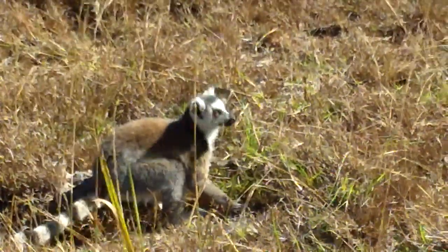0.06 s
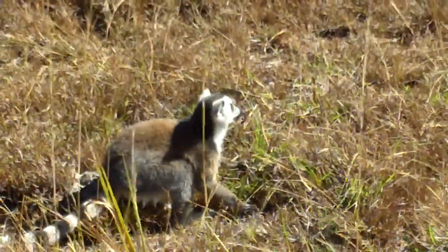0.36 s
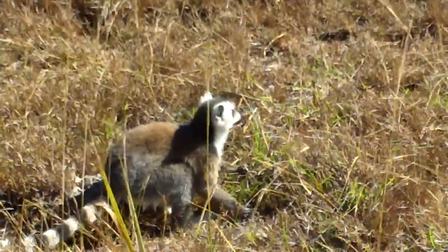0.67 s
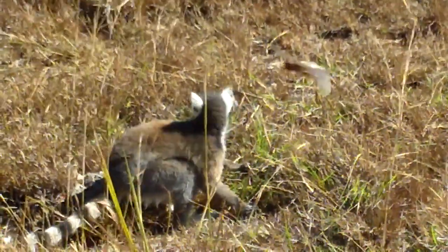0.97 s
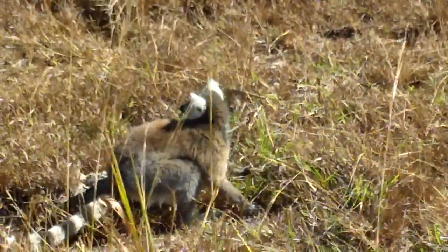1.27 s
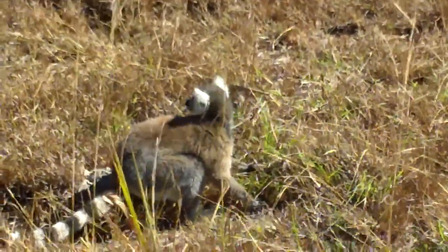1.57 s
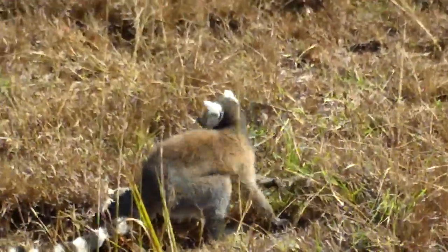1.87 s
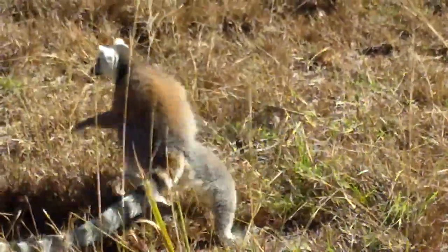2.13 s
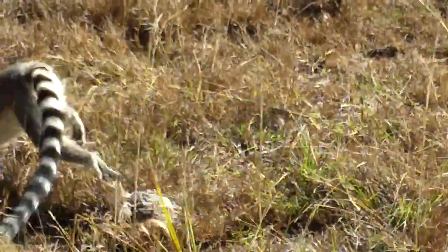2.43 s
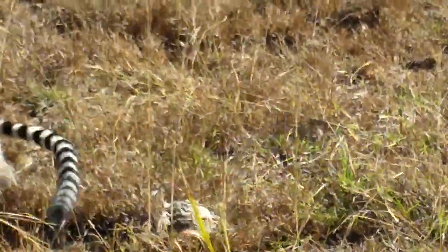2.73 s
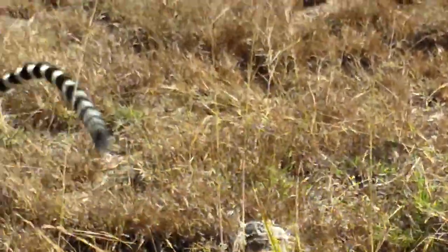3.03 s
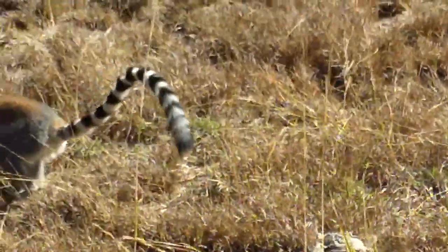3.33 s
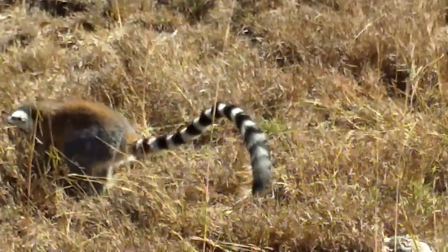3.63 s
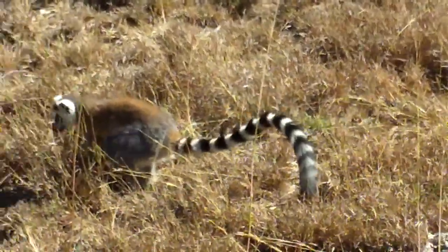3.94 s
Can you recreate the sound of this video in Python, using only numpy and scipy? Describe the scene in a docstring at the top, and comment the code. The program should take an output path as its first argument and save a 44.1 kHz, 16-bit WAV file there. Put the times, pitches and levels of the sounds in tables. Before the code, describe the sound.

One thin wail from a lemur sinks in pitch outdoors while gusts hit the microphone with low thumps and pops. Dry grass then rustles and crackles as the animal leaps off. Insects, a small bird and far hoots stay faint.

```python
"""A ring-tailed lemur gives one thin, slowly falling wail, a stack of overtones shaped by its mouth,
then bounds away through dry grass that swishes and snaps. Wind hits the microphone in low thumps and
pops; the hardest overload it, and the background of air and insects dips after them.
A small bird whistles pure notes, and faint hoots come from far off."""
import sys
import numpy as np
from scipy import signal
from scipy.fft import rfft, irfft, next_fast_len
from scipy.io import wavfile
from scipy.ndimage import map_coordinates

SR = 44100
rng = np.random.default_rng(int(sys.argv[2]) if len(sys.argv) > 2 else 0)


def generate_wav(sig):
    """Save sig (samples, or channels by samples) to the path in sys.argv[1] as 16-bit PCM at SR."""
    pcm = np.round(np.clip(np.atleast_2d(sig).T, -1, 1) * 32767).astype(np.int16)
    wavfile.write(sys.argv[1], SR, pcm)


N = 176400

# how the background dips after the hardest wind thumps: t/s, gain/dB
BACKGROUND_DIPS = [(0, -1), (.128, -1), (.145, -5), (.28, -5), (.36, -7.5), (.56, -6.5), (.82, 0),
                   (1.35, -0.5), (2.1, 1.5), (2.178, -1), (2.188, -6.5), (2.27, -3.5), (2.45, -2),
                   (2.465, -9.5), (2.56, -4), (2.72, -1.5), (3.632, 0.5), (3.648, -12.5), (4, -9.5)]


def amp(db):
    """Turn decibels into a number to multiply by."""
    return 10 ** (np.asarray(db) / 20)


def unit(x):
    """Scale a signal to an average strength (rms) of 1."""
    return x / np.sqrt(np.mean(x ** 2) + 1e-20)


def clock(size=N):
    """The time of each sample in seconds."""
    return np.arange(size) / SR


def curve(points):
    """Join (time, value) points with straight lines, one value per sample."""
    return np.interp(clock(), *np.transpose(points))


def wobble(per_second):
    """A smooth curve through this many random values a second."""
    return map_coordinates(rng.standard_normal(2048), [clock() * per_second], mode="mirror")


def filtered(x, response):
    """Turn each frequency in x up or down by response(hz)."""
    size = next_fast_len(len(x) + 4096)
    return irfft(rfft(x, size) * response(np.fft.rfftfreq(size, 1 / SR)), size)[:len(x)]


def noise(response, size=N):
    """Filtered noise of strength 1."""
    return unit(filtered(rng.standard_normal(size), response))


def shape(points):
    """A filter response through (Hz, dB) points, on a log frequency scale."""
    freqs, db = np.transpose(points)
    return lambda hz: amp(np.interp(np.log(hz + 1), np.log(freqs), db))


def add(track, start, sound):
    """Mix a sound into the track at a start time in seconds."""
    at = round(start * SR)
    part = sound[max(-at, 0):max(N - at, 0)]
    track[max(at, 0):][:len(part)] += part


def tone(hz):
    """A sine wave of strength 1 that follows a moving pitch."""
    return np.sqrt(2) * np.sin(2 * np.pi * np.cumsum(hz) / SR)


def fade(t, length, edge_s):
    """Fade in, hold, and fade out."""
    return np.sin(np.pi / 2 * np.clip(np.minimum(t, length - t) / edge_s, 0, 1))


def bump(x, width):
    """A bell-shaped hill, 1 high where x is 0."""
    return np.exp(-(x / width) ** 2 / 2)


def wind():
    """Wind rumbles, and short swirls of air thump the microphone, some duller, some brighter."""
    # the rumble's rise and fall: t/s, relative level/dB
    rumble_levels = [(0.0, -26.5), (0.62, -34.5), (0.78, -41.5), (1.02, -30.5), (1.17, -34.5), (1.25, -26),
                     (1.64, -33.5), (2.27, -26), (2.93, -31), (3.27, -32.5), (3.4, -30.5), (3.78, -25.5),
                     (3.85, -36.5), (4.0, -36)]
    # the rumble's tone colour: f/Hz, gain/dB
    rumble_colour = [(10, -0.5), (25, 6), (60, -0.5), (110, -6.5), (200, -20), (350, -38), (700, -58.5),
                     (2000, -101)]
    # swirls of air: middle t/s, half length/s, relative level/dB, upper cutoff f/Hz
    swirls = [(0.1, 0.0075, -12.5, 113), (0.133, 0.0086, -14, 222), (0.168, 0.01, -20.5, 137),
              (0.294, 0.0027, -14.5, 257), (0.31, 0.01, -17, 216), (0.35, 0.011, -16, 178),
              (0.41, 0.015, -20.5, 188), (0.497, 0.011, -26.5, 152), (0.682, 0.026, -19.5, 159),
              (0.746, 0.028, -22, 96), (1.092, 0.022, -21, 144), (1.147, 0.014, -18, 120),
              (1.271, 0.015, -16.5, 145), (1.311, 0.017, -24.5, 222), (1.4, 0.0073, -13.5, 87),
              (1.435, 0.012, -16, 101), (1.491, 0.0083, -22, 117), (1.603, 0.012, -14, 107),
              (1.675, 0.024, -13.5, 180), (1.775, 0.012, -15.5, 155), (1.898, 0.012, -21.5, 150),
              (1.952, 0.02, -20.5, 155), (2.048, 0.0096, -13, 163), (2.125, 0.0077, -11.5, 147),
              (2.24, 0.025, -16.5, 240), (2.288, 0.0064, -14, 258), (2.351, 0.0075, -15.5, 178),
              (2.375, 0.0068, -14.5, 304), (2.456, 0.011, -14, 350), (2.562, 0.012, -16.5, 212),
              (2.65, 0.014, -19.5, 173), (2.821, 0.024, -22, 145), (2.925, 0.014, -23, 132),
              (3.067, 0.014, -24.5, 97), (3.176, 0.017, -22.5, 127), (3.269, 0.0072, -20, 60.6),
              (3.33, 0.011, -21.5, 146), (3.374, 0.011, -18, 160), (3.464, 0.011, -15, 125),
              (3.637, 0.013, -11.5, 176), (3.755, 0.024, -23.5, 153), (3.824, 0.039, -25, 170),
              (3.882, 0.021, -21, 155)]
    low_cut_hz, steepness = 37, 4.465
    rumble = unit(amp(2.5 * wobble(13)) * noise(shape(rumble_colour)))
    out = amp(curve(rumble_levels) + 2.5) * rumble
    t = np.arange(-SR // 8, SR // 8) / SR
    for middle, half, db, cutoff in swirls:
        def bass_band(hz):
            """Keep what lies between the low cut and this swirl's cutoff."""
            return hz ** 2 / (hz ** 2 + low_cut_hz ** 2) / (1 + (hz / cutoff) ** 2) ** (steepness / 2)
        swell = bump(t, half)
        burst = swell * rng.standard_normal(len(t))
        even_burst = irfft(np.exp(1j * np.angle(rfft(burst))), len(t))  # all frequencies equally strong
        thump = filtered(even_burst * np.sqrt(swell), bass_band)
        thump *= np.linalg.norm(swell) / np.linalg.norm(thump)
        add(out, middle + t[0], amp(db - 0.5) * thump)
    return out


def background():
    """Open-air hiss and a high band of insects, which dip together."""
    # the air's tone colour: f/Hz, gain/dB
    air_colour = [(100, 2), (500, 6.5), (1000, 3.5), (2000, -1), (4000, -3), (6000, -3), (10000, -6.5),
                  (15500, -11.5)]
    insect_band = noise(lambda hz: bump(hz - 8130, width=1080))
    air = amp(-50.5) * noise(shape(air_colour))
    insects = amp(-55 + 1.4 * wobble(23.75)) * insect_band
    return amp(curve(BACKGROUND_DIPS)) * (air + insects)


def bird():
    """A small bird whistles pure notes that slide up to their pitch."""
    # whistles: start t/s, length/s, f/Hz, level/dB
    whistles = [(.068, 0.076, 3444, -58.5), (0.202, .16, 3456, -57), (1.061, 0.045, 2860, -54.5),
                (2.863, 0.036, 4510, -56.5)]
    slide_hz, slide_s = 230, 0.0142
    out = np.zeros(N)
    for start, length, hz, db in whistles:
        t = clock(int(length * SR))
        pitch = hz - slide_hz * np.exp(-t / slide_s)
        add(out, start, amp(db) * fade(t, length, edge_s=0.021) * tone(pitch))
    return out


def wind_pops():
    """The most sudden blows on the microphone crack and ring for a cycle or two."""
    # blows: t/s, ring gain/dB, ring f/Hz, crack level/dB
    blows = [(.134, -18.5, 240, -43), (.292, -15.5, 260, -42), (2.18, -7, 404, -32.5),
             (2.278, -18.5, 334, -54), (2.378, -19, 337, -56), (2.456, -12.5, 330, -38.5),
             (3.637, -21.5, 420, -39), (3.885, -32, 340, -60)]
    # the crack's tone colour: f/Hz, gain/dB
    crack_colour = [(500, 7.5), (1500, -1.5), (3000, -8), (6000, -17), (14000, -18)]
    rise_s, decay_s, crack_peak_s = 0.00015, 0.0032, 0.0011
    out, t = np.zeros(N), clock(SR // 25)
    crack_swell = t / crack_peak_s * np.exp(1 - t / crack_peak_s)
    for start, ring_db, hz, crack_db in blows:
        ring = np.sin(2 * np.pi * hz * t) * np.exp(-t / decay_s) * (1 - np.exp(-t / rise_s))
        crack = noise(shape(crack_colour), len(t)) * crack_swell
        add(out, start, amp(ring_db) * ring + amp(crack_db) * crack)
    return out


def grass():
    """Dry grass swishes under the bounding lemur; stalks snap, and small ticks come at random."""
    # swishes: middle t/s, half length/s, level/dB
    swishes = [(2.068, 0.037, -50.5), (2.369, .01, -53), (2.549, 0.021, -49.5), (2.754, 0.086, -49.5),
               (2.975, 0.06, -51), (3.1, 0.03, -51.5), (3.18, 0.12, -53), (3.545, 0.023, -50)]
    # dry grass's tone colour: f/Hz, gain/dB
    grass_colour = [(1000, -47), (3500, -10.5), (6000, -6.5), (8200, 4), (10000, -1.5), (13000, -4.5),
                    (15500, -8)]
    # snapping stalks, and at 2.871 s the high part of a small bird's chip: t/s, peak level/dB, ring f/Hz
    snaps = [(.408, -41, 8440), (0.443, -44, 7900), (1.477, -35.5, 8700), (1.716, -38, 8500),
             (2.362, -31, 8500), (2.871, -26.5, 7500), (2.88, -32, 7400), (3.08, -28.5, 8750),
             (3.54, -27, 8400), (3.547, -29.5, 8400), (3.566, -34, 8400)]
    decay_s, ring_width_hz, crack_gain = 0.002, 550, 0.39
    rustle = shape(grass_colour)
    push = sum(amp(db) * bump(clock() - middle, half) for middle, half, db in swishes)
    out = push * unit(noise(rustle) * amp(3 * wobble(450)))  # the fast wobble makes it grainy
    ticks = []
    for start, (softer, higher) in zip(4 * rng.random(36), rng.standard_normal((36, 2))):
        dip_db = np.interp(start, *np.transpose(BACKGROUND_DIPS))
        ticks.append((start, -41 - 0.5 * softer + dip_db, 8130 * np.exp(0.31 * higher)))
    t = clock(SR // 25)
    for start, db, ring_hz in snaps + ticks:
        stalk = lambda hz: crack_gain * rustle(hz) + 1 / (1 + ((hz - ring_hz) / ring_width_hz) ** 2)
        snap = noise(stalk, len(t)) * np.exp(-t / decay_s)
        add(out, start, amp(db) * snap / np.abs(snap).max())
    return out


def hoots():
    """Animal calls from so far off that only their lowest tone carries."""
    # calls: start t/s, length/s, first f/Hz, last f/Hz, level/dB
    calls = [(.68, 0.072, 470, 540, -49.5), (1.45, 0.17, 523, 523, -56), (1.69, 0.077, 507, 495, -52.5)]
    out = np.zeros(N)
    for start, length, first, last, db in calls:
        t = clock(int(length * SR))
        pitch = first + (last - first) * t / length
        add(out, start, amp(db) * fade(t, length, edge_s=0.025) * tone(pitch))
    return out


def lemur():
    """A wail of clean overtones: the middle ones grow as the mouth opens, the high ones fade first."""
    # the wail's pitch: t/s, f/Hz
    melody = [(.73, 444), (.76, 456), (.80, 459.5), (.89, 455), (.975, 451.5), (1.07, 448.5), (1.17, 442),
              (1.22, 434), (1.27, 419), (1.31, 398)]
    # how hard the lemur calls: t/s, relative level/dB
    efforts = [(.73, -30), (.765, -2.5), (.82, 1), (.88, 1), (.96, 0.5), (1.03, 0.5), (1.08, -0.5),
               (1.17, -1.5), (1.22, -8.5), (1.27, -12.5), (1.31, -20)]
    # overtones: multiple of the pitch, base level/dB with the mouth narrow, and with it wide
    overtones = [(1, -63, -64), (2, -51, -54), (3, -51, -49), (4, -58, -53), (5, -59, -54), (6, -76, -75),
                 (7, -64, -58), (8, -70, -64), (9, -59, -56), (10, -65, -67), (11, -76, -76),
                 (13, -70, -71), (14, -67, -64), (15, -73, -73), (16, -60, -65), (17, -70, -73),
                 (18, -69, -72), (19, -70, -74)]
    opens_s, wide_s, dulling = 0.94, 1.06, 0.12
    pitch = curve(melody) * (1 + 0.00226 * wobble(70.8))  # a slight tremble
    effort = curve(efforts)
    mouth = curve([(opens_s, 0), (wide_s, 1)])
    voice = np.zeros(N)
    for multiple, narrow, wide in overtones:
        mouth_db = narrow + (wide - narrow) * mouth
        effort_db = effort * dulling * multiple
        flutter_db = 2 * np.sqrt(multiple / 8) * wobble(21.96)
        voice += tone(multiple * pitch) * amp(mouth_db + effort_db + flutter_db)
    shimmer = amp(0.7 * wobble(60.5))
    start, end = melody[0][0], melody[-1][0]
    return voice * shimmer * fade(clock() - start, end - start, edge_s=0.01)


def field_echo(calls):
    """The ground and bushes scatter the calls, adding a weak, short echo."""
    die_away_s, echo_db = 0.3, -15
    t = clock(SR // 2)
    tail = rng.standard_normal(len(t)) * amp(-60 * t / die_away_s)
    return calls + amp(echo_db) * signal.fftconvolve(calls, tail / np.linalg.norm(tail))[:N]


def scene():
    """Calls across the field, grass, background and wind reach one microphone."""
    calls = field_echo(lemur() + bird() + hoots())
    return (calls + grass() + background() + wind() + wind_pops())[None]


def record(dry):
    """The microphone flattens the hardest thumps, and the very highest treble is cut off."""
    ceiling, top_hz = 0.41, 15720
    rounded = dry[0] / (1 + np.abs(dry[0] / ceiling) ** 8) ** (1 / 8)
    return filtered(rounded, lambda hz: hz < top_hz)[None]


dry = scene()
out = record(dry)
generate_wav(out)
```